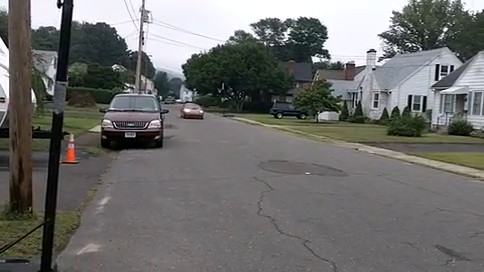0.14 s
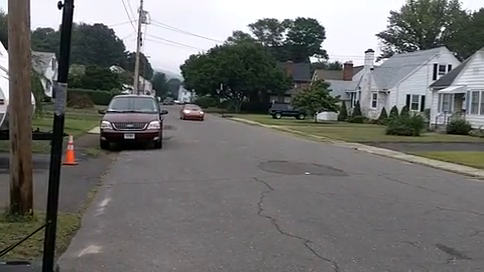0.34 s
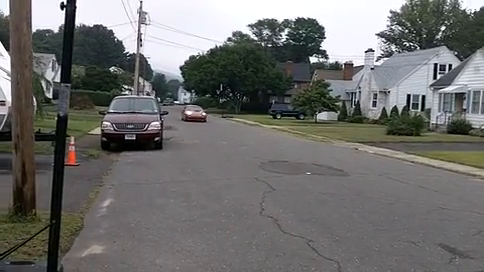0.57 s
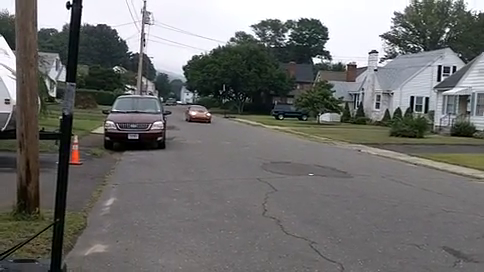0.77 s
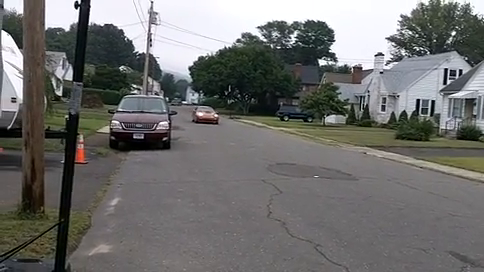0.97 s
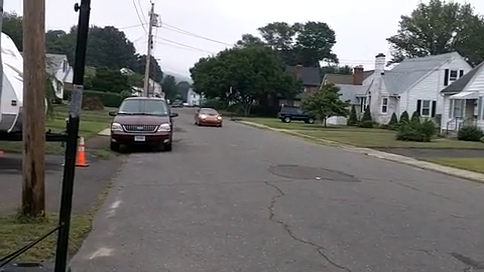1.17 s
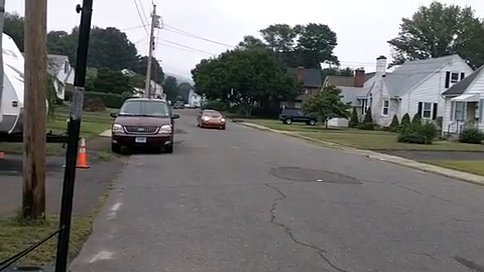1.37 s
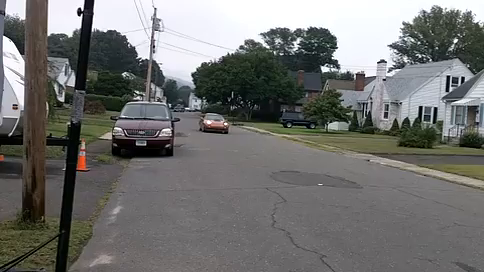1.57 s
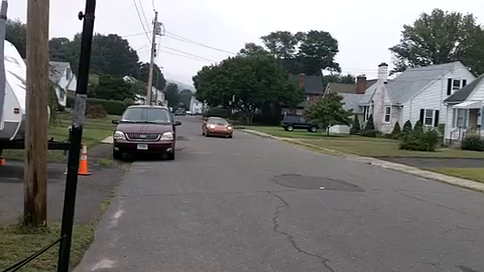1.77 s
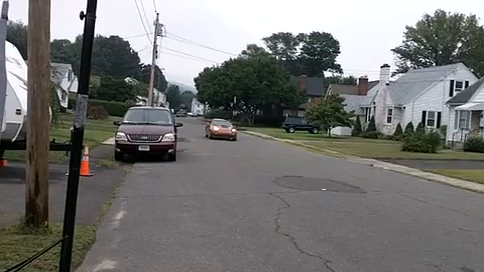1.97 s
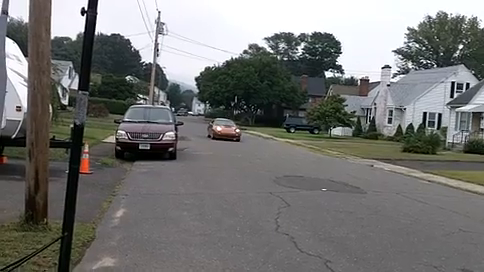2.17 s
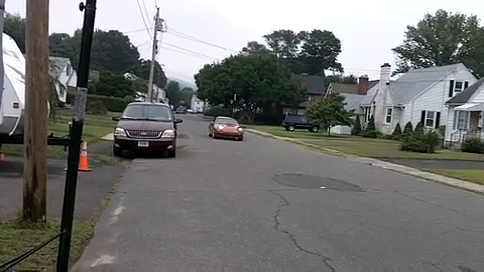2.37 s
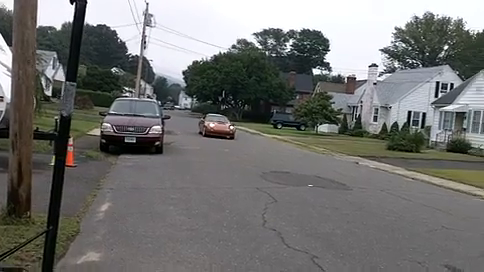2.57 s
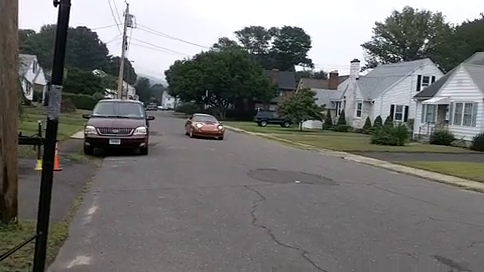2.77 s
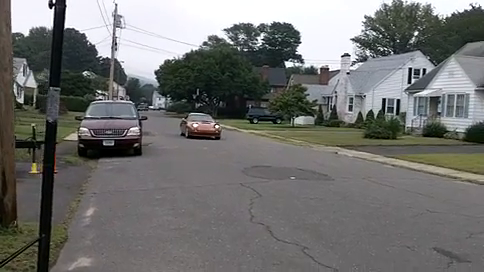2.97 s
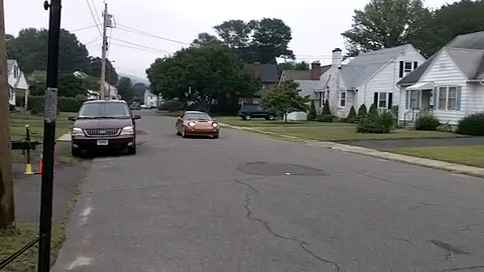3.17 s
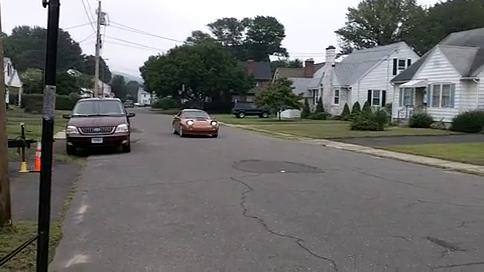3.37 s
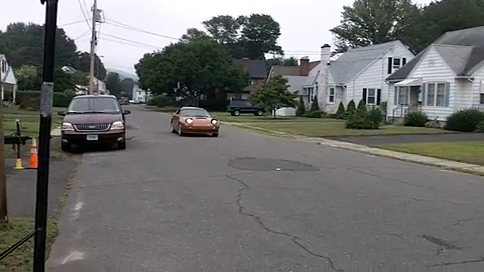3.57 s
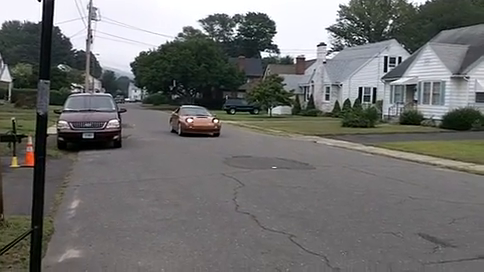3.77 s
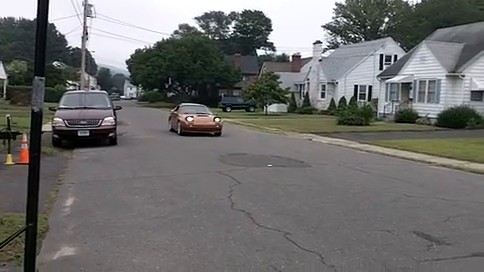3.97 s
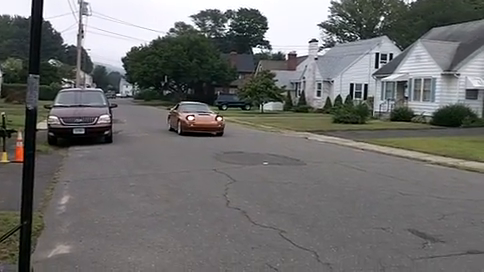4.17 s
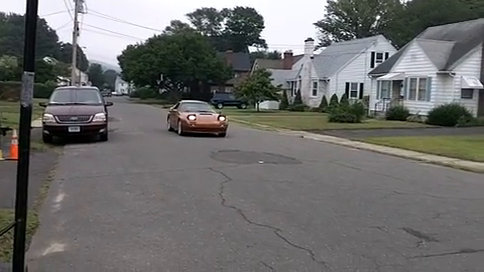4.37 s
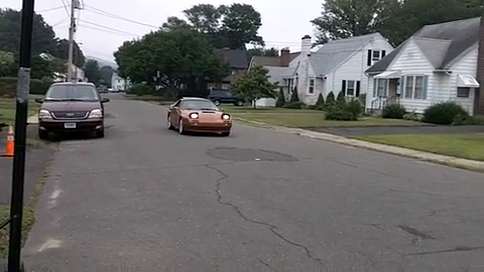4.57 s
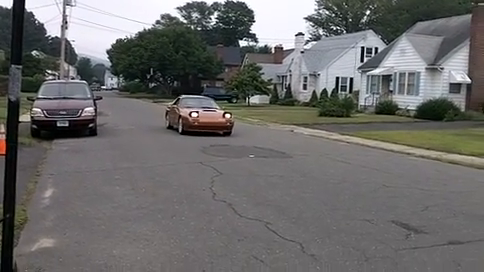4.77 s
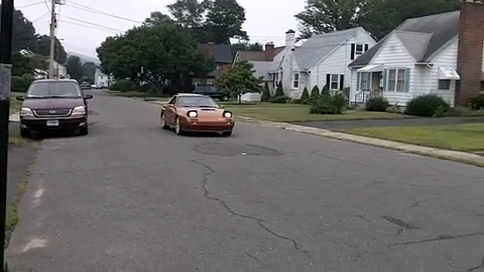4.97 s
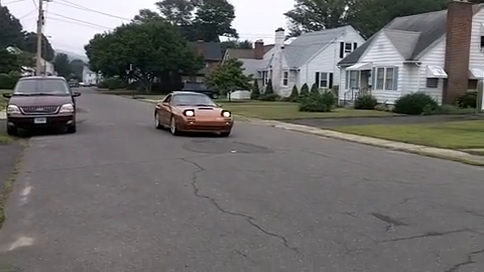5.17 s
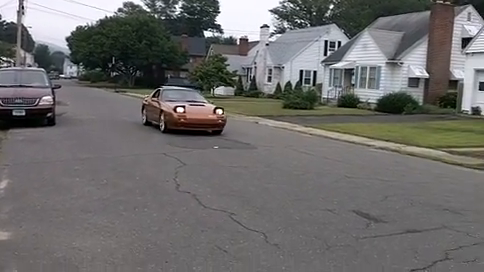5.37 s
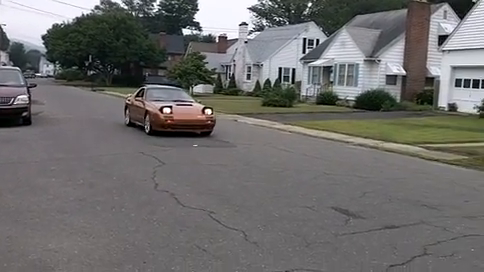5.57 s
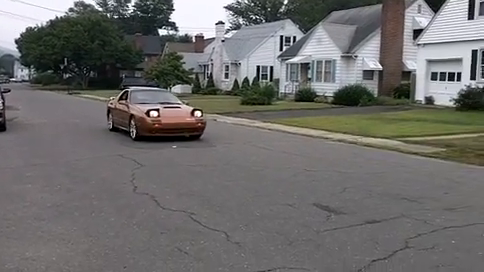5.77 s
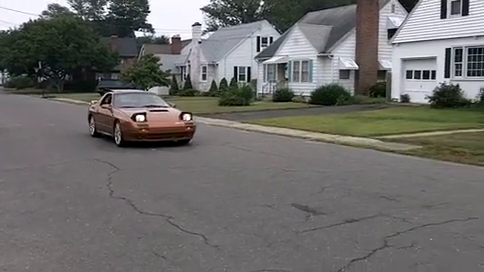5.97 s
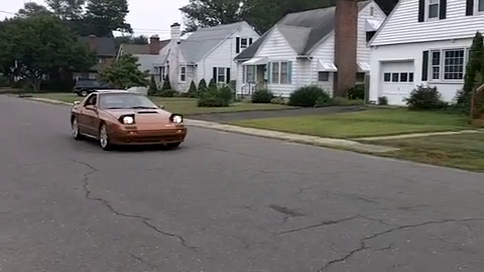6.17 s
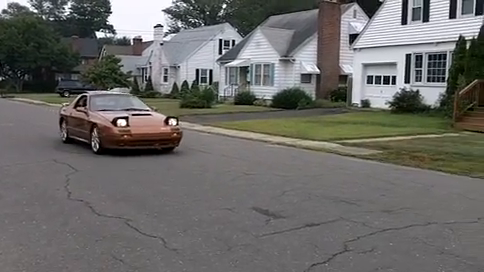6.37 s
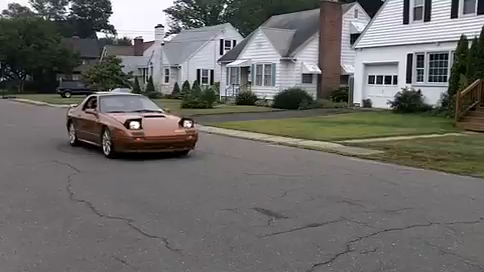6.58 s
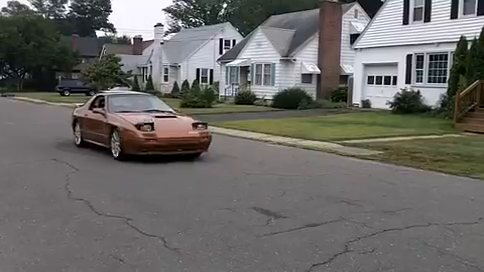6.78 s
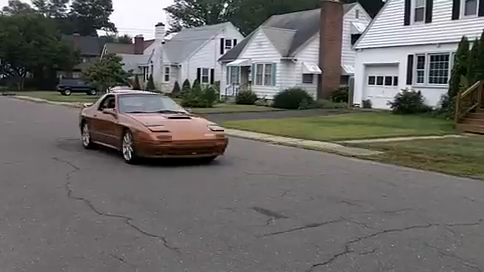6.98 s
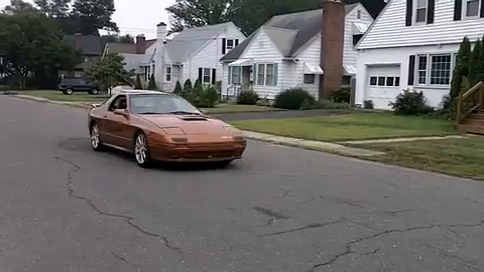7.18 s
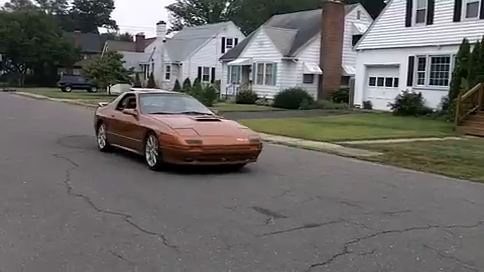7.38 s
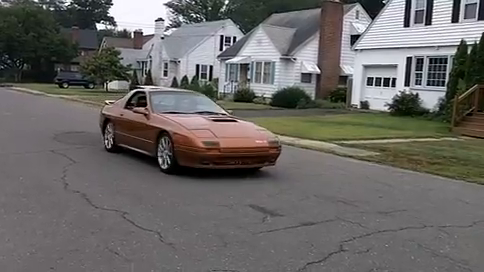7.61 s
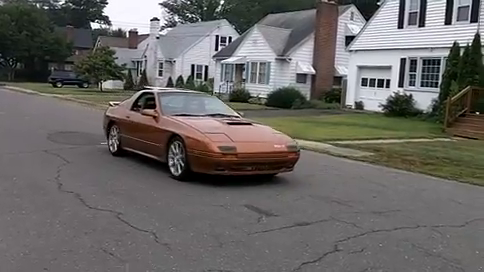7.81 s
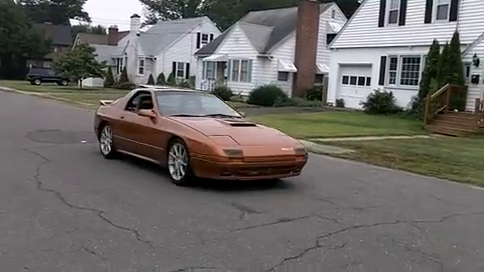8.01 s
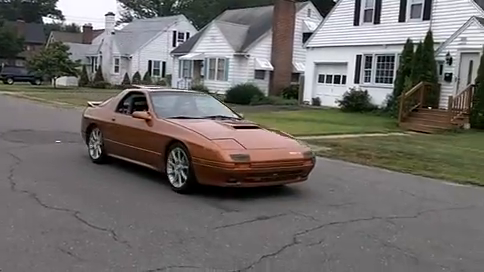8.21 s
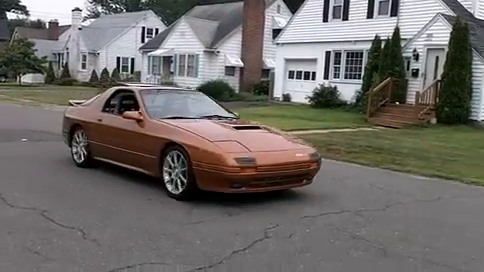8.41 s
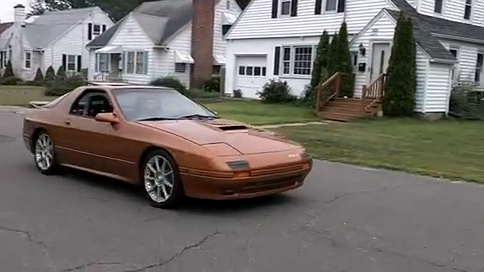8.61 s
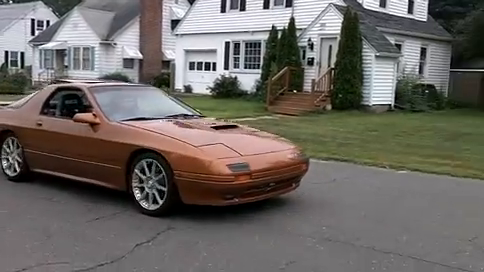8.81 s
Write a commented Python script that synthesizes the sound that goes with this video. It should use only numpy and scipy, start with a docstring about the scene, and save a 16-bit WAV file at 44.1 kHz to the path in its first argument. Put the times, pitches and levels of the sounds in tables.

```python
"""A quiet residential street: a rotary-engined sports car coasts closer, sinks to idle, then picks up.
The bed is low outdoor rumble, one puff of wind and a small bird chirping faintly in the trees.
Tyre roll and engine-bay hiss swell as the car nears; brakes swish, the pop-up headlamps snap shut.
Up front, gas pulses ring in the silencer, with rasp, tailpipe overtones and a whine on top. On the
closed throttle the engine fires unevenly and burbles, and two sharp pops echo off the houses."""
import sys
import numpy as np
from scipy import signal
from scipy.fft import rfft, irfft, next_fast_len
from scipy.io import wavfile

SR = 44100
rng = np.random.default_rng(int(sys.argv[2]) if len(sys.argv) > 2 else 0)


def dump(signal):
    """Clip the signal to [-1, 1] and save it as 16-bit WAV at the path in sys.argv[1]."""
    limited = np.clip(np.atleast_2d(signal).T, -1, 1)
    pcm = np.round(limited * 32767).astype(np.int16)
    wavfile.write(sys.argv[1], SR, pcm)


N = 390285

# bird chirps: t/s, f/Hz, level/dB
BIRD_CHIRPS = [(.085, 4330, -56), (.24, 6100, -64), (.8, 6250, -66), (.83, 6200, -63), (1.41, 6097, -64)]
# the car's approach: t/s, distance/m
CAR_DISTANCE = [(0, 94), (2, 36), (4, 28), (6, 17.5), (7.4, 11.8), (8.3, 7.3), (8.85, 6.5)]
# colours of the tyre roll, engine-bay hiss and exhaust rasp: f/Hz, relative level/dB
TYRE_COLOUR = [(300, -4.5), (700, -1), (860, -2), (1050, 0.5), (1350, -1), (2100, -2), (3300, -4),
               (4000, -4), (4950, -6), (5200, -19.5), (6300, -27.5), (7300, -31), (9000, -46)]
HISS_COLOUR = [(3000, -8), (6000, 8.5), (7500, -3), (9500, -3.5), (12500, -4), (15000, -9)]
RASP_COLOUR = [(130, 9), (200, -1), (250, -3), (345, 0.5), (410, -0.5), (470, -3), (540, -8.5), (610, -11),
               (730, -5), (830, -16.5), (1100, -25.5), (2000, -40.5)]
# brake swish envelope: t/s, level/dB
BRAKE_ENVELOPE = [(0, -76.5), (3.4, -52.5), (4.2, -51), (5.3, -52.5), (5.95, -48.5), (6.3, -53), (7, -56.5),
                  (8.85, -51)]
# knocks and ticks; the pair at 6.78 s is the headlamps shutting: t/s, level/dB, decay/s, low-pass f/Hz
KNOCK_HITS = [(2.664, -30, .002, 4960), (2.68, -38, 0.0012, 8900), (5.912, -33, 0.0086, 1110),
              (6.217, -37.5, 0.018, 2000), (6.779, -28, 0.0054, 1900), (6.7836, -24, 0.0026, 2400),
              (8.153, -37.5, 0.039, 900)]
# whine partials: multiple of the firing rate, relative level/dB
WHINE_PARTIALS = [(8, -9), (12, 0), (24, -2), (36, -5)]
# overtone envelope at the centre of the tailpipe resonance: t/s, level/dB
TAILPIPE_ENVELOPE = [(0, -45.5), (2, -43.5), (3.1, -44), (3.5, -53.5), (5.2, -56), (5.4, -45), (6.3, -42),
                     (7.3, -47), (8.85, -42)]
# runs of stray firings: t/s, number of firings, first peak level/dB
STRAY_RUNS = [(0.297, 1, -20), (0.935, 1, -22.5), (1.085, 2, -22.5), (1.383, 1, -22), (1.49, 3, -20.5),
              (1.834, 3, -19), (2.44, 2, -24), (2.549, 2, -20.5), (2.681, 3, -22), (3.117, 2, -20),
              (3.281, 1, -16)]
# pops: t/s, first burst level/dB, second burst's share, its delay/s, relative crack level/dB
POP_HITS = [(0.4796, 3, 0.25, 0.00175, -7), (2.624, 1, 0.44, 0.0019, -38)]
# the ring of a pop: f/Hz, width/Hz, relative level/dB
POP_RING = [(410, 420, 11), (790, 300, -21), (1240, 144, 7.5), (1910, 350, 9), (3110, 120, -4),
            (3900, 170, 0.5)]
# slapback off the houses: delay/s, relative level/dB
HOUSE_ECHOES = [(0.018, -38), (.045, -29), (.101, -28), (.157, -39)]
# burbles: start t/s, end t/s, firings per stumble, stumble depth 0-1, limp between rotors 0-1, scatter
BURBLE_SPELLS = [(3.281, 3.953, 4, 0.3, 0.23, 0.2), (3.95, 4.45, 4, .7, 0.14, 0.18),
                 (4.45, 4.78, 4, .95, 0.1, .1), (6.7, 6.98, 3, 0.2, 0.3, 0.2), (6.99, 7.3, 3, 0.82, .1, 0),
                 (7.3, 7.663, 2, .7, .05, .1), (8.75, 8.85, 2, 0.6, .05, .2)]
# what the silencer passes; a harmonic swells as it slides over a peak: f/Hz, gain/dB
SILENCER_CURVE = [(38.0, -18), (52.0, -13), (62.0, -22), (70.0, -10.7), (80.0, -11.5), (90.0, 0.5),
                  (100.0, -1), (110.0, -7.5), (126.0, -3), (140.0, -11), (165.0, -12.5), (205.0, -18),
                  (230.0, -33), (280.0, -37)]
# exhaust pulse drive, sharp far off, round on the overrun: t/s, gain at 100 Hz/dB, tilt/(dB per octave)
PULSE_EFFORT = [(0, -27, 3.5), (.6, -35, 11), (1.05, -31.5, 4), (1.6, -32.5, 7.5), (1.76, -43, 19),
                (2.09, -31.5, 11), (2.53, -37.5, 13.5), (3.19, -29, 5), (3.38, -20.5, -5),
                (3.75, -16.5, -10.5), (4.12, -16, -12.5), (4.73, -21, -8.5), (4.86, -19, -0.5),
                (5.3, -13.5, -8.5), (6.7, -21.5, -6.5), (7.3, -24.5, -4.5), (7.8, -22, -1),
                (8.85, -18.5, 1.5)]
# engine speed: t/s, firing rate/Hz
FIRING_RATE = [(0.0, 95.2), (2.2, 91.6), (3.25, 90.8), (3.6, 82), (4.4, 78.2), (4.8, 71.5), (5.5, 63),
               (6.05, 55), (6.6, 46.8), (6.9, 43), (7.4, 40.5), (7.62, 39.4), (7.78, 42.2), (7.97, 39),
               (8.25, 43.7), (8.42, 41.4), (8.75, 48.4), (8.85, 61)]
# notches in the microphone's response: f/Hz, width/Hz
MIC_NOTCHES = [(2700, 884), (5510, 750), (7950, 2650), (10950, 900)]


def from_db(db):
    """Decibels to gain."""
    return 10 ** (np.asarray(db) / 20)


def unit_rms(x):
    """Scale to unit power."""
    return x / np.sqrt(np.mean(x ** 2) + 1e-20)


def automation(rows):
    """Each column of a breakpoint table at every sample."""
    times, *columns = np.transpose(rows)
    return [np.interp(np.arange(N) / SR, times, column) for column in columns]


def butter(x, hz, kind, order=2):
    """Causal Butterworth filter."""
    return signal.sosfilt(signal.butter(order, hz, kind, fs=SR, output="sos"), x + 1e-18)


def drift(hz):
    """Random wobble of roughly unit size, mostly slower than hz."""
    points = rng.standard_normal(int(hz * N / SR) * 2 + 3)
    return np.interp(np.arange(N) / SR * hz * 2, np.arange(len(points)), points)


def noise(colour):
    """Unit-power noise shaped by (f/Hz, level/dB) points, rolling off beyond them."""
    hz, db = np.transpose(colour)
    grid = np.maximum(np.fft.rfftfreq(N, 1 / SR), 1)
    gain = from_db(np.interp(np.log(grid), np.log(hz), db))
    skirts = np.minimum(grid / hz[0], 1) ** 2 * np.minimum(hz[-1] / grid, 1) ** 2
    return unit_rms(irfft(rfft(rng.standard_normal(N)) * gain * skirts, N))


def resonance(x, hz, width_hz):
    """Two-pole resonance with unit gain at its peak."""
    r = np.exp(-np.pi * width_hz / SR)
    feedback = [1, -2 * r * np.cos(2 * np.pi * hz / SR), r * r]
    return signal.lfilter(np.array([1, 0, -1]) * (1 - r * r) / 2, feedback, x + 1e-18)


def clicks(times, sizes):
    """Single-sample impulses."""
    return np.bincount(np.clip(np.round(np.asarray(times) * SR).astype(int), 0, N - 1), sizes, N)


def strike(train, response):
    """Every impulse triggers the response, normalised to peak 1."""
    return signal.oaconvolve(train, response / np.abs(response).max())[:N]


def approach(db_at_10m, db_per_doubling):
    """Gain that rises as the car closes in."""
    metres, = automation(CAR_DISTANCE)
    return from_db(db_at_10m - db_per_doubling * np.log2(metres / 10))


def outdoor_rumble(level_db=-52):
    """A steady low bed under the street."""
    return from_db(level_db) * noise([(22, 1), (45, 4), (120, -8), (250, -18.5)])


def wind_puff(level_db=-38, at_s=5.43, half_width_s=0.1):
    """One soft, sub-bass swell of wind."""
    swell = np.exp(-((np.arange(N) / SR - at_s) / half_width_s) ** 2)
    return from_db(level_db) * swell * noise([(16, -5), (32, 9.5), (50, -17)])


def bird(half_width_s=0.012, glide_hz_per_s=-22000):
    """A small bird: each chirp is a short falling sine."""
    out, t = np.zeros(N), np.arange(-SR // 20, SR // 20) / SR
    envelope = np.exp(-(t / half_width_s) ** 2)
    for at_s, hz, db in BIRD_CHIRPS:
        tone = np.sin(2 * np.pi * (hz + glide_hz_per_s * t / 2) * t)
        start = int(at_s * SR) - len(t) // 2
        out[start:start + len(t)] += from_db(db) * envelope * tone
    return out


def tyres(street_air_db=-48, grit_db=1.27):
    """Tyres roll on gritty asphalt, rising out of street air of the same colour."""
    gain = np.hypot(approach(db_at_10m=-48.5, db_per_doubling=9.6), from_db(street_air_db))
    return gain * from_db(grit_db * drift(70)) * noise(TYRE_COLOUR)


def engine_bay(street_air_db=-67, grit_db=1.27):
    """The engine bay's grainy hiss rises out of the street's own faint hiss."""
    gain = np.hypot(approach(db_at_10m=-60, db_per_doubling=8.5), from_db(street_air_db))
    return gain * from_db(grit_db * drift(120)) * noise(HISS_COLOUR)


def brakes(hiss_hz=3300, hum_hz=1000, hum_db=3):
    """The pads rub in two soft resonances."""
    level_db, = automation(BRAKE_ENVELOPE)
    rub = rng.standard_normal(N)
    swish = resonance(rub, hiss_hz, 220) + from_db(hum_db) * resonance(rub, hum_hz, 150)
    return from_db(level_db) * unit_rms(swish)


def knocks(low_cut_hz=380):
    """Small knocks and the headlamp snap: noise bursts with a hard attack and a fast decay."""
    out, t = np.zeros(N), np.arange(SR // 5) / SR
    for at_s, db, decay_s, bright_hz in KNOCK_HITS:
        burst = butter(rng.standard_normal(len(t)), low_cut_hz, "high")
        burst = butter(burst, bright_hz, "low", order=3)
        start = int(at_s * SR)
        out[start:start + len(t)] += from_db(db) * unit_rms(burst) * np.exp(-t / decay_s)
    return out


def whine(cycles, firing_hz, level_db=-55, knee_hz=83, fade_db_per_hz=1.5, waver_db=1.5, smear_rad=0.81):
    """Rotating parts whine, fading once the firing rate sinks below the knee."""
    out = 0
    for k, db in WHINE_PARTIALS:
        gain = from_db(db + waver_db * drift(8))
        out += gain * np.cos(2 * np.pi * k * cycles + smear_rad * drift(20))
    return from_db(level_db - fade_db_per_hz * np.maximum(knee_hz - firing_hz, 0)) * out


def tailpipe(cycles, firing_hz, pipe_hz=363, half_width_hz=28, waver_db=1.5):
    """Upper harmonics light up as they slide through the tailpipe resonance."""
    level_db, = automation(TAILPIPE_ENVELOPE)
    out = 0
    for k in range(4, 13):
        detune = (k * firing_hz - pipe_hz) / half_width_hz
        gain = from_db(waver_db * drift(11)) / np.hypot(1, detune ** 3)
        out += gain * np.cos(2 * np.pi * k * cycles + k * k)  # k * k spreads the phases
    return from_db(level_db) * out


def rasp(cycles, throb_db=3):
    """Gas rasps out, throbbing with each firing."""
    throb = unit_rms(from_db(throb_db * np.cos(2 * np.pi * cycles)))
    return approach(db_at_10m=-38, db_per_doubling=3.33) * throb * noise(RASP_COLOUR)


def stray_firings(ring_hz=100, width_hz=42, top_hz=152, gap_s=0.045, step_db=3.5, lead_s=0.00874):
    """While the car coasts, stray firings thump in the silencer, singly or in fading runs."""
    hits = [(at_s + k * gap_s, db - k * step_db) for at_s, count, db in STRAY_RUNS for k in range(count)]
    times, levels_db = np.transpose(hits)
    ring = resonance(signal.unit_impulse(SR // 8), ring_hz, width_hz)
    thump = butter(ring, top_hz, "low", order=6)
    return strike(clicks(times - lead_s, from_db(levels_db)), thump)


def pops(low_cut_hz=160, top_hz=4300, tail_db=-44, tail_t60_s=0.41):
    """Each pop is a ringing double burst; the houses return slapback and a thin tail."""
    kick = signal.unit_impulse(SR // 20)
    ring = sum(from_db(db) * resonance(kick, hz, width_hz) for hz, width_hz, db in POP_RING)
    direct = np.zeros(N)
    for at_s, db, share, delay_s, crack_db in POP_HITS:
        burst = butter(ring + from_db(crack_db) * kick, low_cut_hz, "high")
        burst = butter(burst, top_hz, "low", order=4)
        direct += from_db(db) * strike(clicks([at_s, at_s + delay_s], [1, share]), burst)
    t = np.arange(SR // 2) / SR
    street = from_db(tail_db - 60 * t / tail_t60_s) * rng.normal(0, 0.5, len(t))
    for delay_s, echo_db in HOUSE_ECHOES:
        street[int(delay_s * SR)] += from_db(echo_db)
    return direct + signal.oaconvolve(direct, street)[:N]


def firings(cycles, scatter=0.035):
    """Sample and strength of each firing. In a burble some falter and one rotor hits harder."""
    at = np.flatnonzero(np.diff(np.floor(cycles)))
    chance = rng.standard_normal((len(at), 2))
    strength = 1 + scatter * chance[:, 0]
    for start_s, end_s, every, depth, limp, spell_scatter in BURBLE_SPELLS:
        spell = np.flatnonzero((at > start_s * SR) & (at < end_s * SR))
        beat = np.arange(len(spell))
        pattern = (1 - depth * (beat % every == 0)) * (1 - limp * (-1) ** beat)
        strength[spell] = pattern / pattern.mean() + spell_scatter * chance[spell, 1]
    return at, strength


def silencer(hz, skirt_db_per_octave=30):
    """The silencer's minimum-phase response, falling steeply outside its range."""
    points_hz, passed_db = np.transpose(SILENCER_CURVE)
    octaves_outside = np.abs(np.log2(hz / np.clip(hz, points_hz[0], points_hz[-1])))
    db = np.interp(np.log(hz), np.log(points_hz), passed_db)
    db -= skirt_db_per_octave * np.minimum(octaves_outside, 2)
    cepstrum = irfft(np.log(from_db(db)))
    causal_fold = 1 + np.sign(np.fft.fftfreq(len(cepstrum)))
    return np.exp(rfft(cepstrum * causal_fold))


def exhaust(at, strength, firing_hz, waver_db=2.26, flat_below_octave=-0.41, top_hz=490):
    """The engine's body: one gas pulse per firing rings in the silencer; effort sets weight and edge."""
    effort_db, tilt_db = automation(PULSE_EFFORT)
    size = 2 * next_fast_len((N + SR) // 2)
    hz = np.maximum(np.fft.rfftfreq(size, 1 / SR), 1)
    pulses = clicks(at / SR, strength * SR / firing_hz[at] / np.sqrt(2))
    spectrum = rfft(pulses, size) * silencer(hz)
    out, octaves = 0, np.arange(-3, 4) / 2  # half-octave bands around 100 Hz, each wavering on its own
    for octave in octaves:
        band = np.interp(np.log2(hz / 100), octaves, octaves == octave)
        band_db = effort_db + tilt_db * max(octave, flat_below_octave) + waver_db * drift(9)
        out += from_db(band_db) * irfft(spectrum * band, size)[:N]
    return butter(out, top_hz, "low", order=4)


def scene(speed_wobble=0.002):
    """The mono mix: the car over the bird, rumble and wind."""
    firing_hz, = automation(FIRING_RATE)
    cycles = np.cumsum(firing_hz * (1 + speed_wobble * drift(12))) / SR  # one cycle per firing
    at, strength = firings(cycles)
    engine = exhaust(at, strength, firing_hz) + stray_firings()
    engine += tailpipe(cycles, firing_hz) + whine(cycles, firing_hz) + rasp(cycles)
    car = engine + tyres() + engine_bay() + brakes() + pops() + knocks()
    return (car + bird() + outdoor_rumble() + wind_puff())[None]


def record(dry, top_hz=15400):
    """Microphone colour: a row of notches and a steep high cut."""
    out = dry
    for hz, width_hz in MIC_NOTCHES:
        out = signal.lfilter(*signal.iirnotch(hz, hz / width_hz, fs=SR), out)
    return signal.sosfilt(signal.ellip(10, 0.1, 80, top_hz, fs=SR, output="sos"), out)


dry = scene()
out = record(dry)
dump(out)
```